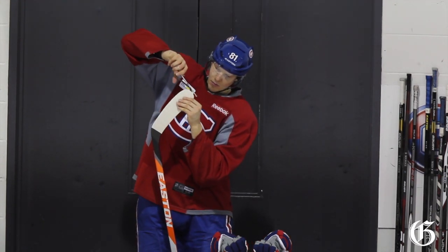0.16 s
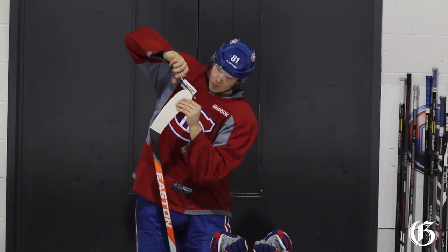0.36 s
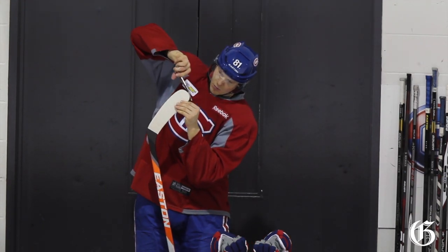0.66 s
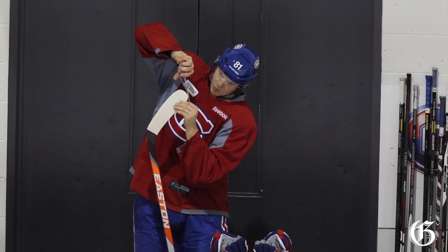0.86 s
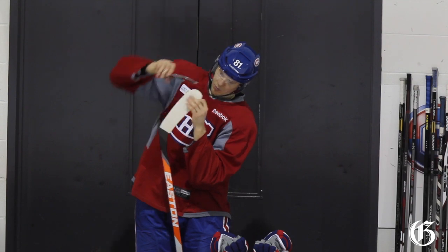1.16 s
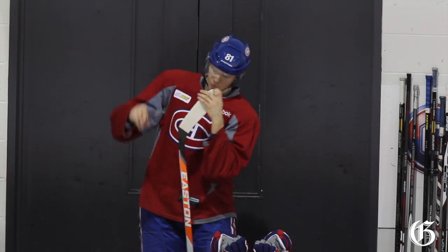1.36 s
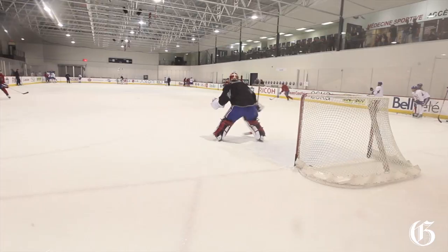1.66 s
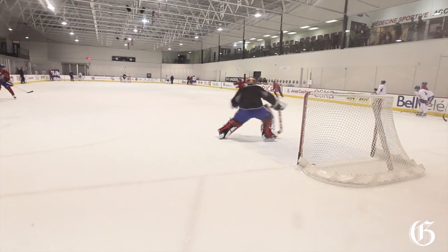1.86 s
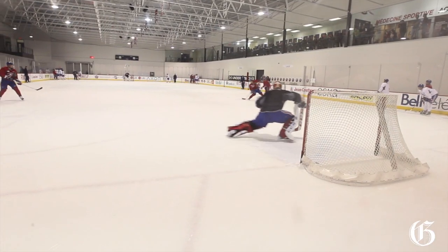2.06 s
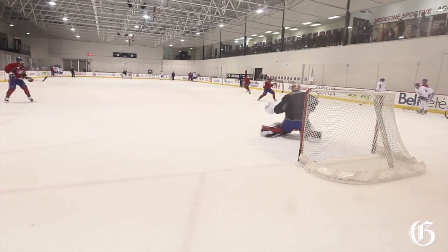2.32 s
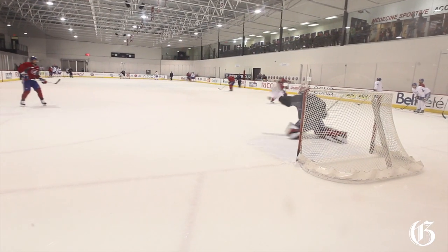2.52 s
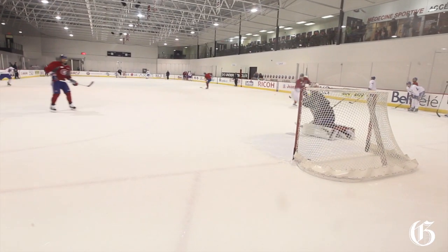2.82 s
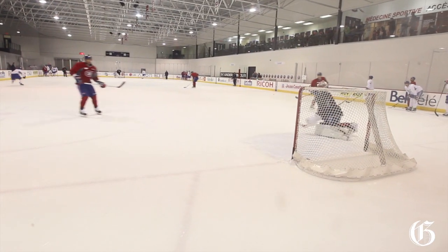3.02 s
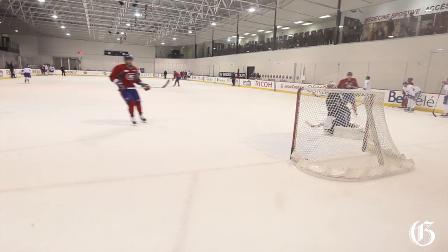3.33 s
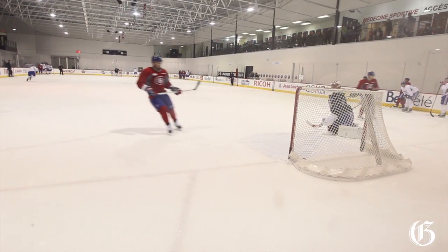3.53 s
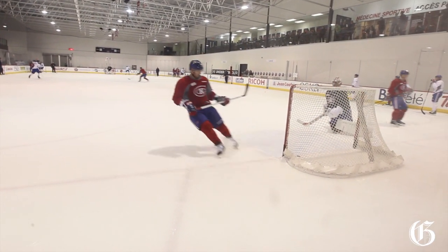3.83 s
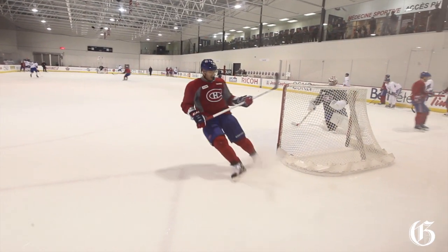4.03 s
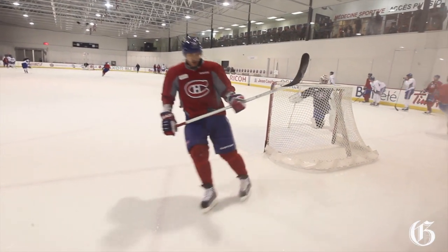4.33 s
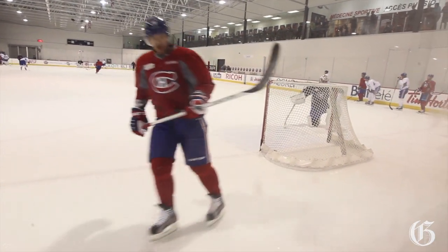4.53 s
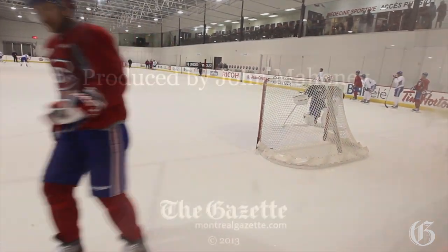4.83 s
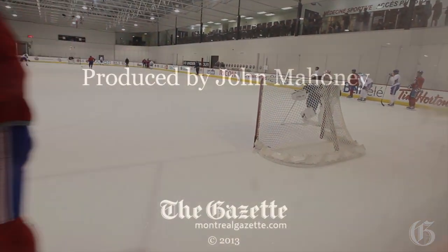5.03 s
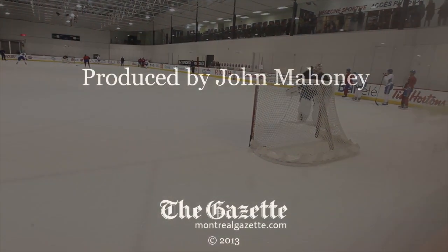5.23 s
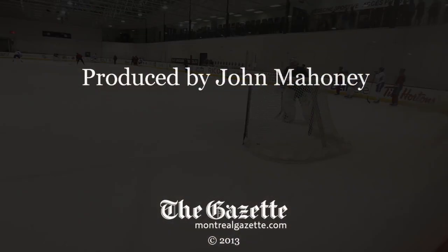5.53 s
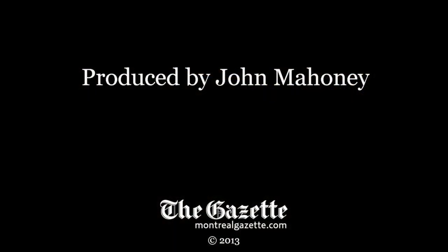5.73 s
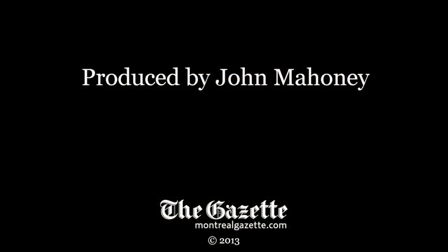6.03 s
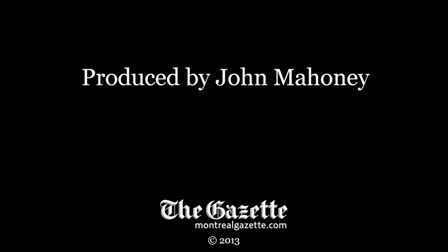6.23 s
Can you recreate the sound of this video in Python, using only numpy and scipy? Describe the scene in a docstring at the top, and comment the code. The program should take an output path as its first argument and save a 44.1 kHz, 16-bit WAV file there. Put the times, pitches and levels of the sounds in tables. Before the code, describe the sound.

From 0 to 1.57 s, a quiet corridor: steady ventilation rush, soft cloth tape rubbing on a hockey stick, small knocks and dry ticks near the start, at 0.57 and 1.0 s, then a snap at 1.27 s and a brighter, brief rub peaking near 1.38 s. At 1.57 s it cuts abruptly to a much louder ice rink, with low rumble and broad scraping as a goalie shuffles. Around 2.15 s an edge bites with a short hum and his pads slap rapidly. At 2.75 s a shot bangs violently, clipping and ducking the level, with a quick rebound, boom and hall echo; a lone knock follows at 2.97 s. A skater's hollow glide recovers and approaches, humming through turns, with a step at 3.74 s and crunchy scrapes and knocks around 4.5-4.65 s. He passes near 4.85 s; the fade starts at 5.08 s, a faint last step falls at 5.53 s, and silence follows from 5.8 s.

```python
"""Soft rubbing and a few ticks come first: a hockey stick is taped in a ventilated corridor.
Then, abruptly, a loud ice rink: a goalie shuffles and drops on his pads, a puck bangs and overloads
the preamplifier, a skater carves past, and everything fades away; both ears hear the same.
Air, tape, gliding blades and ice are shaped noise and random grains under swells of force; a turning
blade hums as narrow-band noise; stick blade, boots, steel and knocks on the ice ring as decaying modes."""
import sys
import numpy as np
from scipy import signal
from scipy.fft import rfft, irfft, next_fast_len
from scipy.io import wavfile
from scipy.ndimage import uniform_filter1d, map_coordinates

SR = 44100
rng = np.random.default_rng(int(sys.argv[2]) if len(sys.argv) > 2 else 0)


def inscribe(sig):
    """Save sig as 16-bit PCM at rate SR to the path in sys.argv[1].

    A 1-D sig is mono; a 2-D sig holds one channel per row.
    Samples are clipped to [-1, 1] before scaling.
    """
    pcm = np.round(np.clip(np.atleast_2d(sig).T, -1, 1) * 32767)
    wavfile.write(sys.argv[1], SR, pcm.astype(np.int16))


N = 281137


def amp(db):
    """The decibel law: level to amplitude ratio."""
    return 10 ** (np.asarray(db) / 20)


def unit(x):
    """Normalization to an rms amplitude of 1."""
    return x / np.sqrt(np.mean(x ** 2) + 1e-20)


def clock():
    """Uniform sampling: the time of every sample [s]."""
    return np.arange(N) / SR


def wobble(rate):
    """Band-limited random modulation: a smooth curve through rate random knots a second."""
    knots = rng.standard_normal(int(N * rate / SR) + 4)
    return map_coordinates(knots, [clock() * rate])


def filtered(x, response):
    """Linear filtering: the spectrum of x times a response of frequency."""
    m = next_fast_len(N + SR // 2)  # padding keeps the end from wrapping round
    hz = np.fft.rfftfreq(m, 1 / SR)
    return irfft(rfft(x, m) * response(hz), m)[:N]


def coloured(x, spectrum):
    """Spectral shaping: x filtered by levels drawn over log frequency, at rms 1."""
    f, db = np.transpose(spectrum)
    return unit(filtered(x, lambda hz: amp(np.interp(np.log(hz + 1), np.log(f), db))))


def rush(spectrum, patchy_db):
    """Turbulent noise of rms 1: its bands swell and sink in patches of time and frequency."""
    z = signal.stft(rng.standard_normal(N), nperseg=1024)[2]
    field = rng.standard_normal(z.shape)
    field = uniform_filter1d(field, size=6, axis=0)  # across frequency
    field = uniform_filter1d(field, size=8, axis=1)  # along time
    patchy = signal.istft(z * amp(patchy_db * unit(field)), nperseg=1024)[1][:N]
    return coloured(patchy, spectrum)


def crackle(spectrum, rate, spread_db, share):
    """Random fracture: uneven grains, rate a second, take a share of the power beside a smooth hiss; rms 1."""
    happens = rng.random(N) < rate / SR
    sign = rng.choice([-1, 1], N)
    size = amp(spread_db * np.clip(rng.standard_normal(N), -2, 2))
    grains = np.sqrt(share) * unit(happens * sign * size)
    hiss = np.sqrt(1 - share) * rng.standard_normal(N)
    return coloured(grains + hiss, spectrum)


def dying(s, t60):
    """Exponential decay: an envelope that starts at time s and falls 60 dB in t60."""
    age = clock() - s
    return (age >= 0) * amp(-60 * np.abs(age) / t60)


def struck(blows, modes):
    """Modal excitation: each (time, peak level) blow rings the damped modes at new strengths."""
    out, t = np.zeros(N + SR), np.arange(SR // 2) / SR
    hz, level, t60 = np.transpose(modes)[:, :, None]
    onset = 1 - np.exp(-(2 * hz * t) ** 2)  # each mode builds up within its first cycle
    damped = onset * amp(-60 * t / t60) * np.sin(2 * np.pi * hz * t)
    for s, db in blows:
        strength = amp(level + 2 * rng.standard_normal(hz.shape)) * rng.choice([-1, 1], hz.shape)
        ring = np.sum(strength * damped, axis=0)
        start = max(round(s * SR), 0)
        out[start:start + len(t)] += amp(db) * ring / np.abs(ring).max()
    return out[:N]


def swell(s, rise, release):
    """Exponential growth and decay: climbs its last 20 dB in rise, peaks at s, loses 20 dB in each release."""
    age = clock() - s
    return amp(-20 * np.maximum(-age / rise, age / release))


def swells(rows, power):
    """Addition of powers: the joint gain of (s, rise, release, dB) swells, each raised to a power."""
    total = sum((amp(db) * swell(s, rise, release) ** power) ** 2 for s, rise, release, db in rows)
    return np.sqrt(total)


def ventilation():
    """Broadband flow noise: a steady rush of air with slight unrest."""
    # Air noise: (frequency [Hz], relative spectral density [dB])
    vent_spectrum = [(25, -55), (45, -38), (75, -27), (110, -15.5), (200, -8.5), (280, -4), (390, 0),
                     (660, -2), (1000, 0.5), (1280, 3.5), (1500, 0), (2060, 0), (3200, -11), (5000, -24),
                     (9000, -61.5), (13000, -82)]
    level_db, waver_db = -39, -1
    return amp(level_db + waver_db * wobble(11.5)) * rush(vent_spectrum, patchy_db=1.0)


def taping():
    """Friction and adhesive fracture: each pull rubs cloth tape along the blade and peels its glue."""
    # Cloth rubbing: (frequency [Hz], relative spectral density [dB])
    tape_spectrum = [(1200, -17), (3000, 10.5), (4500, 1), (6000, -4.5), (8000, -18), (11000, -38),
                     (16000, -55)]
    # Glue peeling: (frequency [Hz], relative spectral density [dB])
    glue_spectrum = [(4000, -18), (7000, 7), (9000, -1.5), (11000, -9), (13000, -21), (16000, -27.5)]
    # Tape coming free: (frequency [Hz], relative spectral density [dB])
    snap_spectrum = [(1500, -13.5), (3000, -0.5), (9000, -5.5), (16000, -15)]
    # Swells of tension; rise and release are per 20 dB before the powers below:
    # (peak time [s], rise [s], release [s], rubbing level [dB], peeling level [dB])
    pulls = [(.04, 0.34, .5, -52, -80), (.2, .3, .8, -55.5, -90), (.46, .05, .4, -59, -80),
             (.7, .2, .4, -60, -82), (1.25, 0.87, 0.33, -60, -67.5), (1.38, .25, .6, -47.5, -67)]
    snap_s, snap_db, snap_t60_s = 1.2738, -42, .014  # the tape snaps free of the roll
    *timing, rub_db, peel_db = np.transpose(pulls)
    rub_gain = swells(zip(*timing, rub_db), power=0.87)
    rub = rub_gain * crackle(tape_spectrum, rate=1500, spread_db=8, share=.35)
    peel_gain = swells(zip(*timing, peel_db), power=1.2)
    peel = peel_gain * crackle(glue_spectrum, rate=700, spread_db=4, share=.4)
    burst = coloured(rng.standard_normal(N), snap_spectrum)
    snap = amp(snap_db) * dying(snap_s, snap_t60_s) * burst
    return rub + peel + snap


def blade_ticks():
    """Modal ringing of the stick blade: each tick joins a knock and a dry click."""
    # Ticks on the blade: (time [s], knock peak level [dB], dry click peak level [dB])
    tick_blows = [(0.015, -27, -39), (.055, -32, -27.5), (0.072, -35, -36), (.565, -26.5, -36),
                  (1.006, -28, -43), (1.013, -26, -35), (1.271, -25, -38), (1.2744, -27, -27)]
    # Knock modes: (frequency [Hz], relative level [dB], 60 dB decay time [s])
    blade_modes = [(950, -2, 0.011), (1310, 3, 0.016), (1710, 2, .012), (2230, -13, .008)]
    # Dry click modes: (frequency [Hz], relative level [dB], 60 dB decay time [s])
    click_modes = [(3000, 2, 0.022), (3550, 2, .016), (4300, -5, .006), (5400, -4, .005), (7550, -15, .002)]
    s, knock_db, click_db = np.transpose(tick_blows)
    return struck(zip(s, knock_db), blade_modes) + struck(zip(s, click_db), click_modes)


def corridor():
    """Superposition of the ventilation, the taping and the ticking blade."""
    return ventilation() + taping() + blade_ticks()


def skating():
    """Rolling noise of sliding contact: the hall drones; loaded blades rumble, and roar as they glide."""
    # Hall drone and blade rumble: (frequency [Hz], relative spectral density [dB])
    drone_spectrum = [(20, -27.5), (55, -31), (100, -13.5), (145, -12.5), (195, -1), (275, -2.5), (390, 4),
                      (490, -2), (620, -2), (900, -22), (2000, -57)]
    # The goalie's shuffling: (frequency [Hz], relative spectral density [dB])
    shuffle_spectrum = [(200, -43), (450, -4.5), (620, -2.5), (950, 1), (1350, -0.5), (1750, -0.5),
                        (2600, -5), (3300, -13), (4500, -19.5), (8000, -62)]
    # The skater's glide: (frequency [Hz], relative spectral density [dB])
    glide_spectrum = [(200, -35.5), (500, -0.5), (700, -3.5), (900, -0.5), (1120, 1), (1300, -0.5),
                      (1550, -0.8), (2200, -3), (2900, -8), (3600, -17.5), (4800, -27.5), (8000, -66),
                      (12000, -84.5)]
    hall_db, rumble_db, turn_rumble_db = -31, -25.5, -30
    drop_s = 2.16  # the goalie's blades rumble until he drops on his pads
    straighten_s, straighten_release_s = 4.62, .6  # the skater's rumble until he straightens up
    goalie_db, skater_db = -15, -17.5
    pass_s, pass_width_s, pass_gain_db = 4.85, 0.3, 0.46  # the skater comes closest
    mirror_s, mirror_share = .00091, 0.21  # a reflection off the ice hollows his glide close by

    # the goalie's broad scraping gives way to the approaching skater's hollower glide
    handover = np.interp(clock(), [2.7, 2.95], [0, np.pi / 2])
    upright = np.interp(clock(), [drop_s, drop_s + 0.043], [1, 0])
    straightened = np.maximum(clock() - straighten_s, 0)
    turning = np.sin(handover) * amp(-20 * straightened / straighten_release_s)
    load = amp(rumble_db) * upright + amp(turn_rumble_db) * turning
    drone_gain = np.hypot(amp(hall_db), load) * amp(1.4 * wobble(16))
    drone = drone_gain * rush(drone_spectrum, patchy_db=1.5)

    goalie = amp(goalie_db) * np.cos(handover) * rush(shuffle_spectrum, patchy_db=1.05)
    nearness = 1 / (1 + ((clock() - pass_s) / pass_width_s) ** 2)
    skater_gain = amp(skater_db + pass_gain_db * nearness) * np.sin(handover)
    skater = skater_gain * rush(glide_spectrum, patchy_db=0.66)
    mirrored = mirror_share * nearness * np.interp(clock() - mirror_s, clock(), skater)
    return drone + amp(0.7 * wobble(30)) * (goalie + skater + mirrored)


def edges():
    """Brittle fracture under pressure: with each stroke an edge scrapes, shaves the ice and throws spray."""
    # Edge scraping: (frequency [Hz], relative spectral density [dB])
    scrape_spectrum = [(500, -30), (900, -6), (1150, 0.5), (1650, -7), (2200, -1), (3000, -2),
                       (3800, -11.5), (6000, -35.5), (9000, -61)]
    # Shaved ice: (frequency [Hz], relative spectral density [dB])
    shavings_spectrum = [(1500, -26), (3000, 5.5), (3900, 4.5), (5500, 0.5), (7000, -11), (8800, -22),
                         (11000, -48), (16000, -59)]
    # Ice spray: (frequency [Hz], relative spectral density [dB])
    spray_spectrum = [(4000, -17.5), (7000, 5.5), (8800, -0.5), (10500, -8.5), (12500, -17.5), (15800, -24)]
    # Swells of pressure; rise and release are per 20 dB before the powers below: (peak time [s],
    # rise [s], release [s], scraping level [dB], shaved ice level [dB], spray level [dB])
    strokes = [(1.6, 0.25, 1, -28.5, -30.5, -49), (1.8, 0.43, 0.88, -26.5, -30.5, -50.5),
               (2.0, 0.61, .4, -31, -38, -48), (2.15, 0.026, 0.78, -23, -22, -33),
               (2.53, .2, .25, -27.5, -38, -58.5), (2.97, .12, .8, -21, -34, -56),
               (3.26, 0.081, 0.62, -25.5, -46.5, -54), (3.75, 0.029, 0.7, -25, -35, -45.5),
               (4.13, 1.9, .9, -25.5, -29.5, -37), (4.15, .04, .13, -22.5, -40, -50),
               (4.506, .04, .3, -26, -27, -42.5), (4.55, .07, .14, -20, -24.5, -52),
               (4.64, .15, .8, -17.5, -30.5, -56), (5.165, .15, 0.55, -29, -33, -49.5),
               (5.545, 0.057, 0.43, -21, -25, -40)]
    shave_rest_db, spray_rest_db = -42.5, -71.5  # what flat blades shed between strokes
    *timing, scrape_db, shave_db, spray_db = np.transpose(strokes)
    scraped = swells(zip(*timing, scrape_db), power=1)
    shaved = np.hypot(amp(shave_rest_db), swells(zip(*timing, shave_db), power=1))
    # spray grows faster than the pressure on the edge
    thrown = np.hypot(amp(spray_rest_db), swells(zip(*timing, spray_db), power=1.8))
    scrape_grains = crackle(scrape_spectrum, rate=990, spread_db=3.5, share=.4)
    scrape = scraped * amp(1.2 * wobble(35)) * scrape_grains
    shaving_grains = crackle(shavings_spectrum, rate=2500, spread_db=4.5, share=0.25)
    shavings = shaved * amp(0.73 * wobble(44)) * shaving_grains
    spray = thrown * crackle(spray_spectrum, rate=4000, spread_db=6.0, share=.35)
    return scrape + shavings + spray


def carving(knots_per_s, unrest_db):
    """Quadrature modulation: the ice hums under a turning blade, a narrow noise about a centre frequency."""
    # Turns: (peak time [s], rise per 20 dB [s], release per 20 dB [s], level [dB], centre frequency [Hz])
    turns = [(2.151, .07, 0.058, -18, 480), (2.99, 0.1, 0.12, -20, 420), (3.78, 1.2, 0.43, -21, 448.3),
             (4.48, 0.97, 0.36, -26.5, 383), (4.63, .05, .25, -30, 280)]
    out = np.zeros(N)
    for s, rise, release, db, centre_hz in turns:
        phase = 2 * np.pi * centre_hz * clock()
        in_phase = wobble(knots_per_s) * np.cos(phase)
        quadrature = wobble(knots_per_s) * np.sin(phase)
        out += amp(db) * swell(s, rise, release) * unit(in_phase + quadrature)
    return out * amp(unrest_db * wobble(18))


def footwork():
    """Modal ringing on impact: knocks sound on the ice; each step knocks the boot and ticks its steel."""
    # Knocks on the ice: the goalie's pads slapping, then one lone knock after the shot, perhaps
    # the puck dropping: (time [s], peak level [dB])
    ice_knocks = [(2.145, -6.5), (2.152, -12), (2.158, -18), (2.164, -20), (2.169, -4), (2.1745, -1.5),
                  (2.183, -12), (2.968, -8.5)]
    # Modes of these knocks: (frequency [Hz], relative level [dB], 60 dB decay time [s])
    knock_modes = [(200, -31, 0.08), (352, -12, 0.058), (530, 10, 0.0207), (990, 24, 0.011),
                   (2298, 11, 0.0093)]
    # Skate blades set down: (time [s], boot knock peak level [dB], sharp tick peak level [dB])
    step_blows = [(3.744, -16, -18.5), (4.503, -15, -15.5), (4.541, -17, -18), (4.548, -4, -27),
                  (4.607, -10.5, -25), (5.534, -16, -13.5), (5.551, -30, -29), (5.583, -19, -22)]
    # Boot modes: (frequency [Hz], relative level [dB], 60 dB decay time [s])
    boot_modes = [(824, 1, 0.099), (1176, -4.5, 0.076), (2120, -23, 0.03), (2890, 0, 0.02)]
    # Steel modes: (frequency [Hz], relative level [dB], 60 dB decay time [s])
    steel_modes = [(4070, 7, 0.078), (5410, -1, .04), (6350, 6, 0.024), (8340, -7, .02)]
    s, knock_db, tick_db = np.transpose(step_blows)
    steps = struck(zip(s, knock_db), boot_modes) + struck(zip(s, tick_db), steel_modes)
    return steps + struck(ice_knocks, knock_modes)


def puck():
    """Impact and reverberant decay: a shot cracks and rebounds; the boards thud and boom, the hall rings on."""
    # Blow and rebound: (time [s], reference level before each layer's offset [dB])
    shot_blows = [(2.752, 16.5), (2.819, -7)]
    # Crack: (frequency [Hz], relative spectral density [dB])
    crack_spectrum = [(40, -19.5), (150, -4), (500, 5), (900, -9), (2200, -0.5), (3500, -11.5), (6000, -16),
                      (10000, -25), (16000, -43)]
    # Thud of the boards: (frequency [Hz], relative spectral density [dB])
    boards_spectrum = [(100, -26), (250, -17), (400, -12.5), (490, 3), (535, 3.5), (620, -11.5), (710, -15),
                       (850, -20.5), (2000, -42)]
    # Boom: (frequency [Hz], relative spectral density [dB])
    boom_spectrum = [(50, -27.5), (100, -8), (140, 3.5), (195, 7.5), (260, -22), (500, -51.5)]
    # Hall echo: (frequency [Hz], relative spectral density [dB])
    echo_spectrum = [(100, -32), (280, -10.5), (450, -1.5), (900, -15), (1600, -0.5), (2400, 3),
                     (3100, 2.5), (4000, -4.5), (7000, -16.5), (9500, -31.5), (12000, -49), (16000, -67.5)]
    crack_gain = sum(amp(db - 3.5) * dying(s, t60=0.13) for s, db in shot_blows)
    crack = crack_gain * coloured(rng.standard_normal(N), crack_spectrum)
    s, db = shot_blows[0]  # only the first blow is heavy enough to shake the boards
    thud = amp(db - 12) * dying(s, t60=0.18) * coloured(rng.standard_normal(N), boards_spectrum)
    boom = amp(db - 42.0) * dying(s, t60=2.5) * coloured(rng.standard_normal(N), boom_spectrum)
    echo = amp(db - 30) * dying(s, t60=1.3) * rush(echo_spectrum, patchy_db=0.5)
    return crack + thud + boom + echo


def scene():
    """Superposition of sources: the corridor, then abruptly the rink until it has faded to silence."""
    rink_start_s = 1.574
    fade_start_s, fade_end_s, fade_power = 5.08, 5.785, 1.57
    ice = skating() + edges() + carving(knots_per_s=200, unrest_db=1.8) + footwork() + puck()
    fade = np.interp(clock(), [fade_start_s, fade_end_s], [1, 0]) ** fade_power
    mono = np.where(clock() < rink_start_s, corridor(), ice * fade)
    return np.array([mono, mono])


def gain_control(x, ceiling, attack_s, recover_db):
    """Level compression: gain ducks when the mean level passes the ceiling, recovering recover_db a second."""
    pole = np.exp(-1 / (attack_s * SR))
    level = signal.lfilter([1 - pole], [1, -pole], np.abs(x))
    excess_db = 20 * np.log10(np.maximum(level / ceiling, 1))
    climb = recover_db * clock()
    return amp(climb - np.maximum.accumulate(excess_db + climb))


def record(dry):
    """Amplitude and band limiting: the preamplifier clips, gain control ducks, the top band is cut."""
    overload, top_hz = .95, 15830
    clipped = np.clip(dry[0], -overload, overload)
    held = clipped * gain_control(clipped, ceiling=0.49, attack_s=0.002, recover_db=25.5)
    mono = filtered(held, lambda hz: hz < top_hz)
    return np.array([mono, mono])


dry = scene()
out = record(dry)
inscribe(out)
```